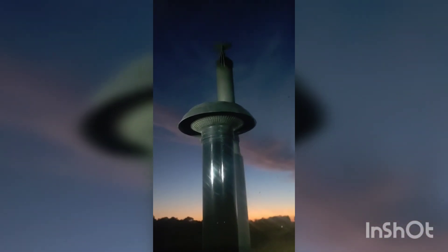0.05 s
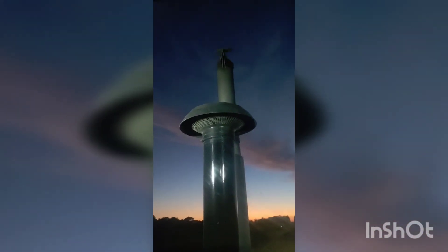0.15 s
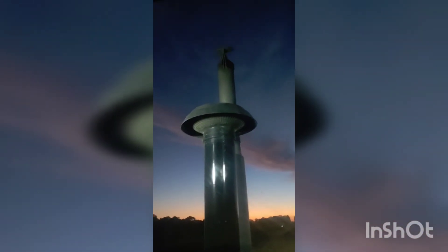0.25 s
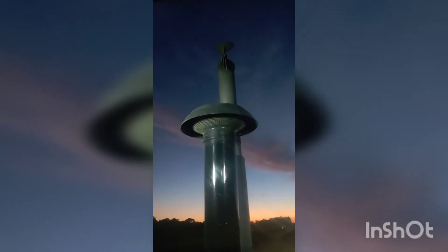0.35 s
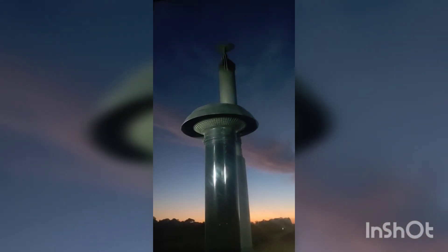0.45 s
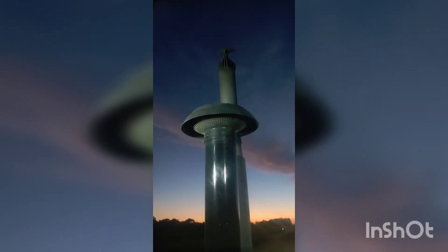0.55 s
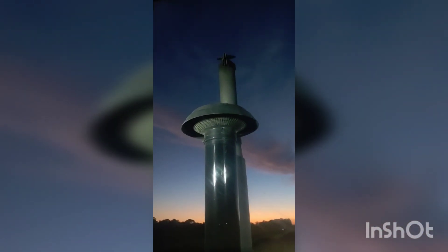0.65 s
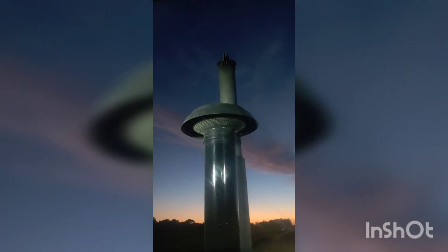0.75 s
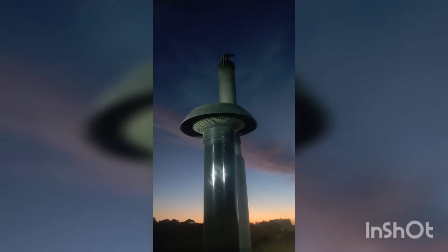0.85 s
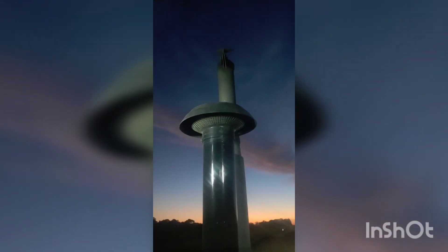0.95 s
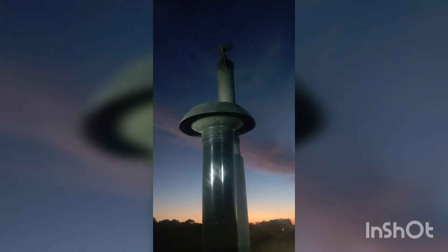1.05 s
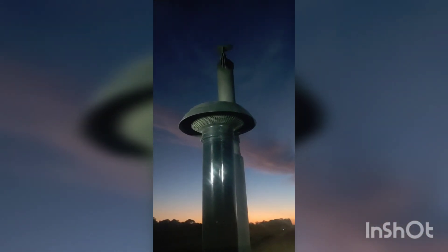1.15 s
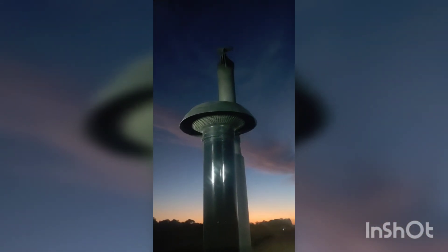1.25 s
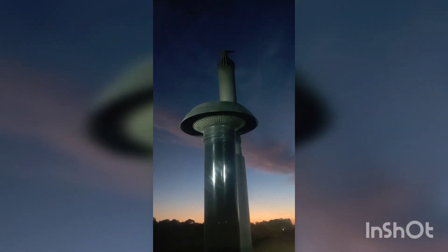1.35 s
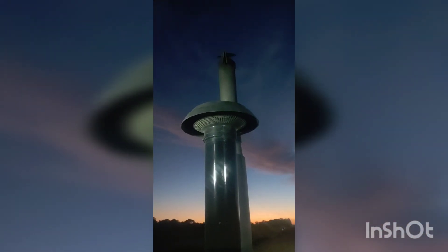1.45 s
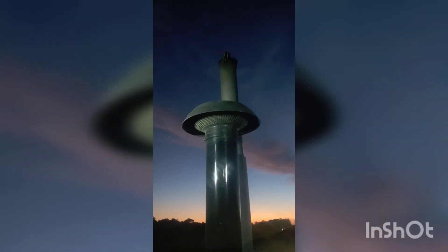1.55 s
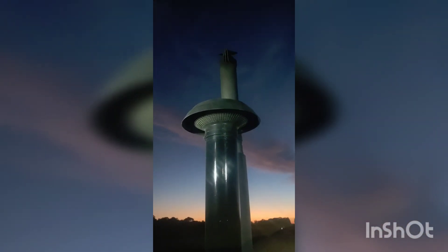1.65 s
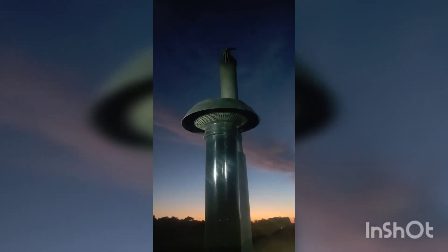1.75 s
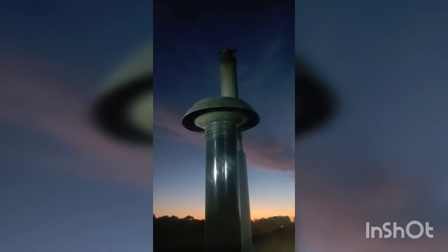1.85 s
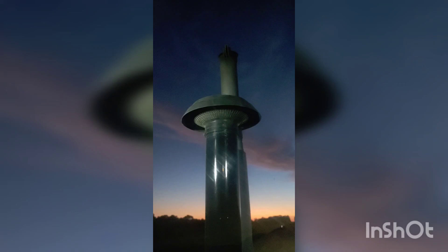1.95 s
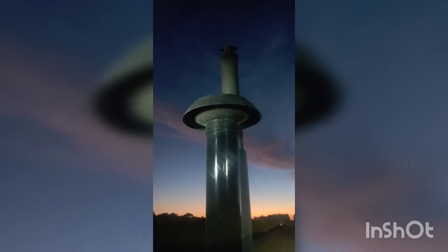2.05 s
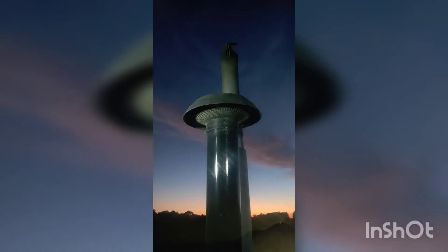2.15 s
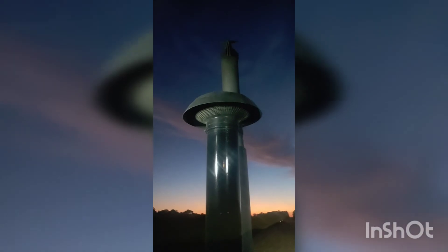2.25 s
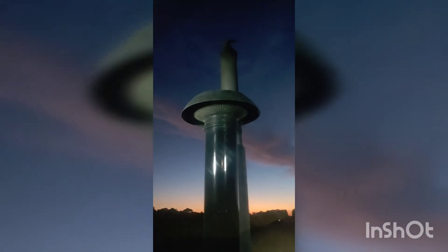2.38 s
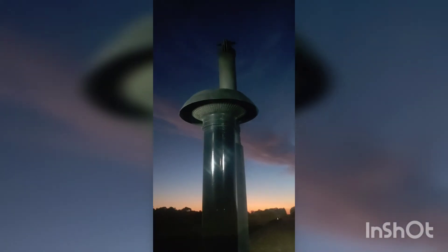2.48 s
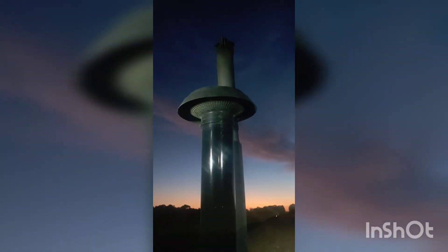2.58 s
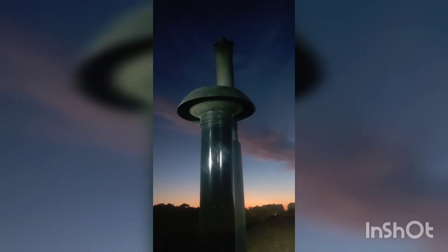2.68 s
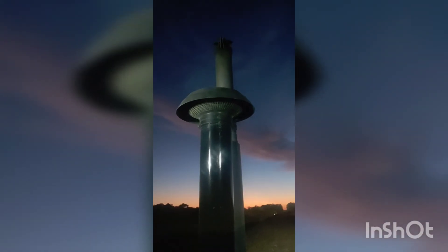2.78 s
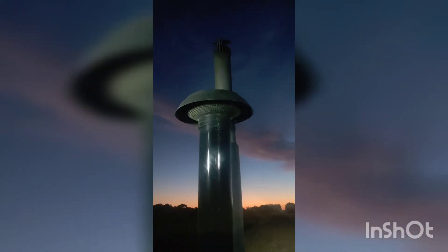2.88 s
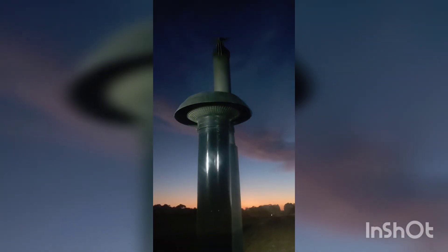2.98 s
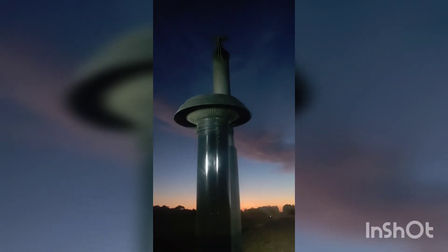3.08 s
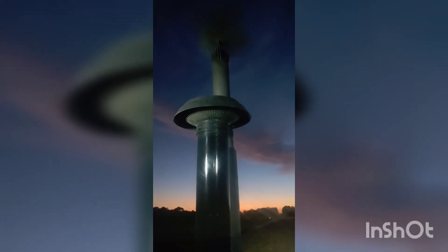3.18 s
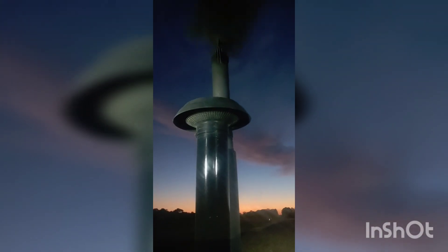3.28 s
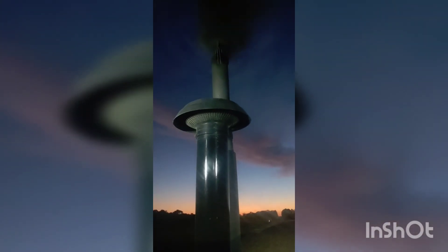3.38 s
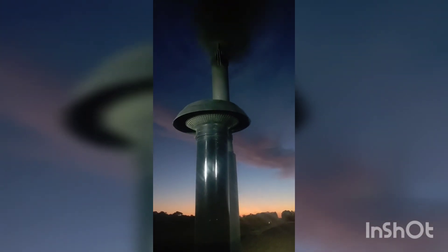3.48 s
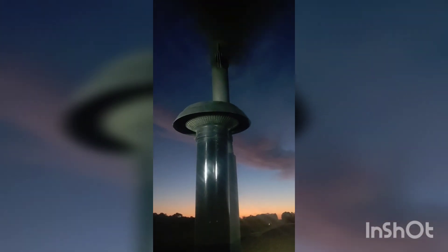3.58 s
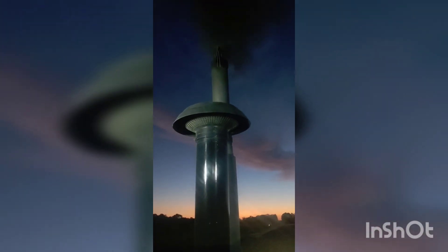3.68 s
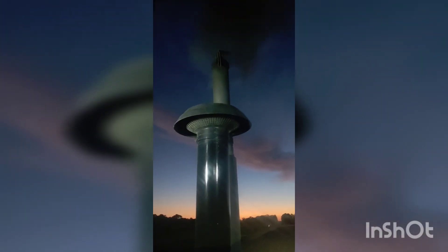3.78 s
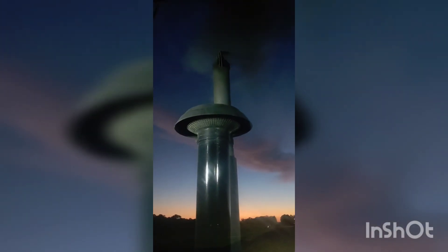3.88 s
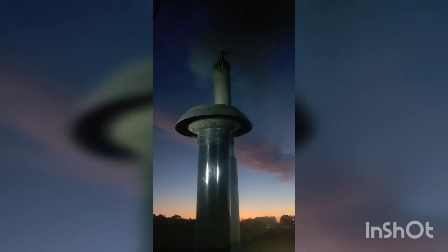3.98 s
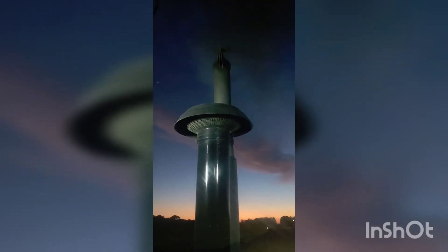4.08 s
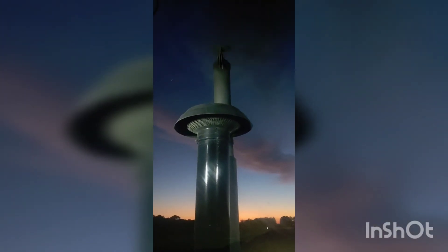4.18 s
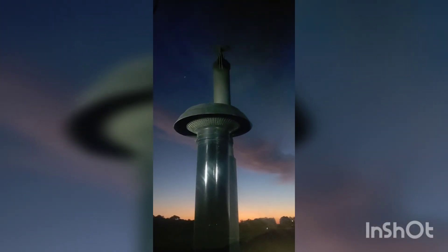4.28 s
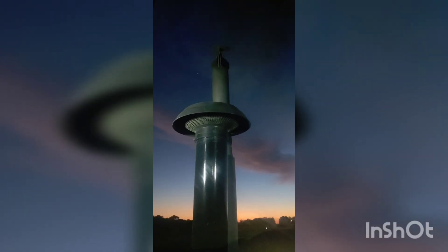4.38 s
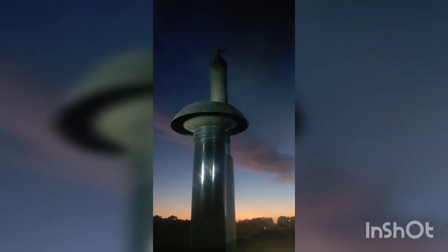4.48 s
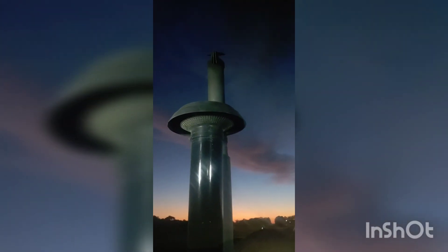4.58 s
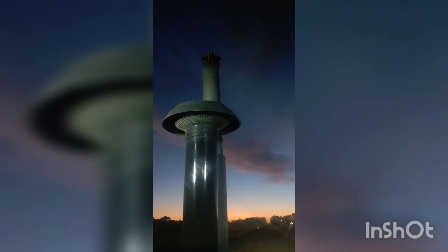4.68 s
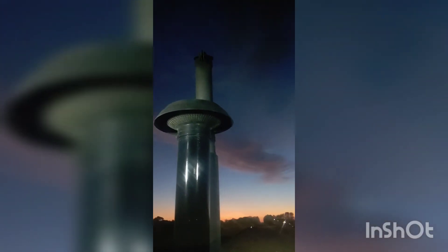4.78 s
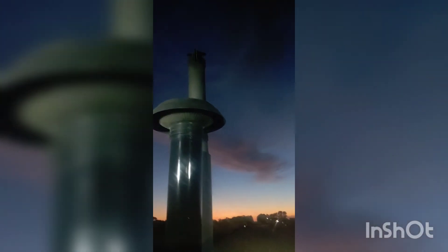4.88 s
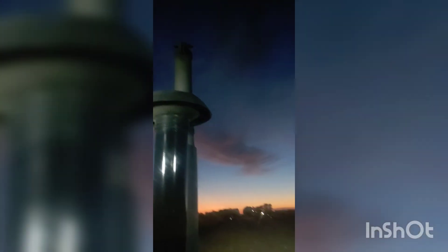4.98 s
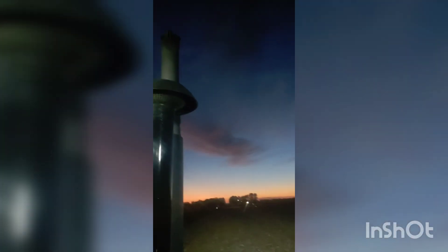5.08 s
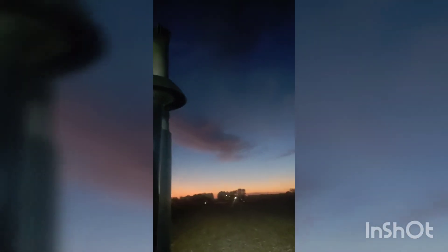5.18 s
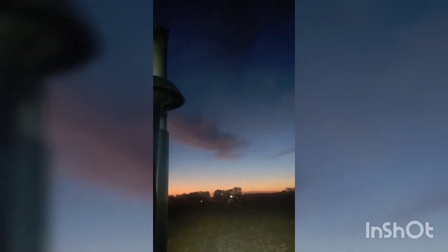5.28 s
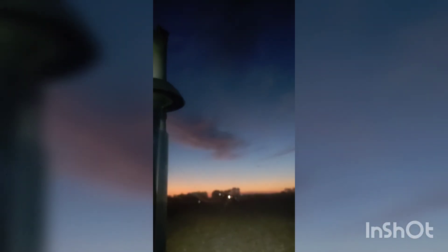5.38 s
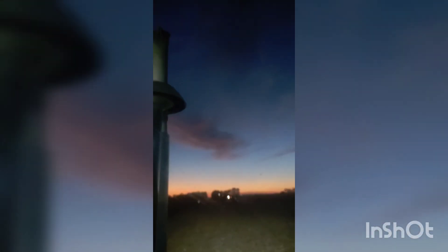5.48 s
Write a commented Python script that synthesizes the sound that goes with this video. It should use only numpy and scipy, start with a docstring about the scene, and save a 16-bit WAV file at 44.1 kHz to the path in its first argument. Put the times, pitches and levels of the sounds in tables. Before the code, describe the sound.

A six-cylinder tractor diesel idles in a closed cab, blips lightly, settles, then revs hard just after three seconds and coasts down.

```python
"""Inside a closed tractor cab a six-cylinder diesel idles, and a first blip lifts it over the opening half second.
Throughout, crank orders and a pump excite the cab's modes; clatter, roar, knock and valves are noise pulsed by firing;
a housing rings on one pitch and a gear mesh glides past it. From 0.3 s an injector ticks in decaying bursts at low
speed. The engine sinks to idle by 2 s; a second, harder blip at 3 s peaks near 3.7 s in knock and valve noise.
It then coasts down, and the ticks return after 5 s."""
import sys
import numpy as np
from scipy import signal
from scipy.fft import rfft, irfft, next_fast_len
from scipy.io import wavfile
from scipy.ndimage import uniform_filter1d

SR = 44100
rng = np.random.default_rng(int(sys.argv[2]) if len(sys.argv) > 2 else 0)


def to_wav(s):
    """Save 16-bit WAV."""
    ch = np.atleast_2d(s).T  # columns
    pcm = np.round(np.clip(ch, -1, 1) * 32767)  # PCM
    wavfile.write(sys.argv[1], SR, pcm.astype(np.int16))


N = 244314

# modes of the cab's air and panels: (f/Hz, nominal width/Hz, level/dB)
CAB_MODES = [(30, 30, -28), (60.5, 27, -20.5), (89, 38, -11.5), (106.4, 12.4, -1), (127.9, 12, 6),
             (146.4, 8.1, 2), (154, 11, -6), (170.4, 16, -2), (187.6, 15.4, -0.5), (233, 12.5, -5.5),
             (246.6, 18, 1.5), (263, 8.6, -1), (283, 11, -13.5), (309, 11, -14.5), (389, 19, -13),
             (513, 33, -15), (597, 26, -11)]
# broad colour of each noise: (f/Hz, relative density/dB per Hz); its ringing panels: (f/Hz, width/Hz, level above it/dB)
CLATTER_COLOUR = [(180, -84), (300, -1.5), (411, -9), (489, -3.5), (587, -8), (706, -8), (754, -12),
                  (1280, -22.5), (1610, -17.5), (2250, -10.5), (3360, -24.5), (4000, -29.5), (5200, -35),
                  (8800, -120)]
CLATTER_RINGS = [(323, 14, 8), (483, 18, 9), (520, 30, 5), (562, 14, 5), (609, 18, 8), (700, 36, 7),
                 (797, 16, 6), (1760, 86, 4), (2212, 26, 9), (2285, 60, 6), (2430, 60, 6), (2505, 45, 6)]
ROAR_COLOUR = [(180, -10), (300, -11), (375, -5.5), (440, -9.5), (484, -5.5), (532, -3.5), (620, -3),
               (700, 0), (800, -4.5), (920, 3), (1020, -0.5), (1300, -2), (1380, -6), (1930, -12),
               (2250, -9.5), (2650, -10), (3800, -29.5), (4940, -51), (8360, -120)]
ROAR_RINGS = [(490, 50, 5), (614, 30, 8), (984, 22, 6), (1056, 36, 7), (1175, 26, 7), (1258, 22, 6),
              (1305, 26, 6), (1513, 22, 10), (1838, 26, 6), (2555, 28, 5), (2722, 42, 8)]
KNOCK_COLOUR = [(2290, -49), (3900, -1), (4460, 2.5), (5170, 2), (5630, 1), (5900, -3), (7670, -46),
                (13000, -120)]
KNOCK_RINGS = [(4200, 80, 3.5), (4490, 75, 6.2), (4990, 64, 8.6), (5230, 68, 8.1), (5580, 87, 4.4)]
VALVE_COLOUR = [(3290, -45), (5600, -5.5), (6120, -0.5), (6420, 0.5), (8150, -3), (8870, -6), (9830, -6),
                (13000, -13), (15500, -26)]
VALVE_RINGS = [(6090, 70, 9), (6700, 50, 6), (7100, 40, 4), (7840, 30, 6), (8470, 40, 6), (9510, 50, 8),
               (9770, 50, 5), (10100, 70, 5), (10480, 50, 6), (11450, 90, 6), (12620, 35, 11)]
# metallic resonances of the injector tick: (f/Hz, width/Hz, level above the flat part/dB)
TICK_RINGS = [(10300, 700, 8), (11440, 500, 15), (12800, 900, 7)]
# coherence of the two ports: (f/Hz, share of power common to both)
COMMON_SHARE = [(60, 0.94), (130, 0.98), (290, 0.8), (640, 0.62), (1400, 0.088), (3100, 0.38),
                (6800, 0.072), (15000, 0.1)]
# balance of the ports: (f/Hz, left minus right level/dB)
LEFT_MINUS_RIGHT = [(60, 9), (110, 2), (200, 0.5), (380, -4.5), (700, 2), (1290, -1.5), (2380, -8.5),
                    (4400, 1.5), (8120, -3.5), (15000, -12)]
# crank speed: (t/s, turns per s)
CRANK_SPEED = [(0.0, 12.49), (0.14, 13.32), (0.3, 15.47), (0.58, 16.12), (0.9, 15.62), (1.52, 15.58),
               (1.85, 13.53), (2.09, 12.93), (2.3, 13.37), (3.07, 13.33), (3.3, 17.5), (3.5, 21),
               (3.73, 26.2), (3.93, 24.1), (4.33, 21.1), (4.6, 19.5), (5.12, 15.15), (5.54, 12.89)]
# how hard each of the six cylinders raps: (relative level/dB, scaled for each layer)
CYLINDER_RAP = [0.85, 0.65, 1.5, 0.4, 0.76, 0.85]
# harshness of combustion: (t/s, level over idle/dB)
LOAD = [(0, -0.5), (.1, 6), (.14, 11), (.18, 8), (.205, 9), (.23, 9), (.27, 8.5), (.29, 14.5), (.32, 9.5),
        (.35, 15.5), (.38, 11), (.41, 11.5), (.48, 8.5), (.56, 8.5), (.68, 4), (1.45, 5.5), (1.74, -3.5),
        (2.11, 2.5), (2.96, 3), (3.05, 6.5), (3.14, 9), (3.18, 13.5), (3.26, 15.5), (3.29, 16.5),
        (3.34, 17.5), (3.38, 19.5), (3.46, 21.5), (3.58, 21.5), (3.62, 21.5), (3.695, 19.5), (3.72, 15.5),
        (3.78, 12), (3.85, 11.5), (3.9, 9), (4.02, 9), (4.12, 7.5), (4.4, 4.5), (5.3, -5), (5.54, -2.5)]
# layer laws: (gain at idle/dB, dB per dB of load, dB per dB of crank speed, dB per product of the two)
BOOM_LAW = (-30, -0.0082, 1.25, 0.0724)
CLATTER_LAW = (-39.5, 0.0224, 1.08, 0.0388)
ROAR_LAW = (-46.5, 0.869, -0.17, 0.0832)
# crank orders that shake the cab: (multiple of crank speed, relative level at idle/dB)
CRANK_ORDERS = [(4, -16), (4.5, -14), (5, -1), (5.5, -9), (6, -1), (6.5, -11), (7, 0), (7.5, -11), (8, 5),
                (8.5, -14), (9, 2.5), (9.5, -14), (10, -5), (11, -6), (11.5, -9), (12, -8), (13, -8),
                (14, -7), (15, -3), (16, -3), (17, 3), (18, -7), (18.5, -5), (19, -7), (20, -10), (21, -8),
                (21.5, -7), (23, -8), (24.5, -11), (26, -2), (27, -8), (28, -2)]
# orders of the geared pump: (multiple of crank speed, relative level/dB)
PUMP_ORDERS = [(7.85, -5), (15.7, 5.5)]
# uneven boom level, with sudden rises and drops: (t/s, level/dB)
BOOM_UNEVENNESS = [(0, 1.5), (.17, -0.5), (.22, 0.5), (.35, -3.5), (.55, 1.5), (.65, -1), (1.2, 0),
                   (1.7, 1), (1.9, 2), (1.95, 0.5), (3.07, -1), (3.11, 2), (3.22, -2.5), (3.29, 2),
                   (3.4, -4), (3.6, -2), (3.9, -1), (4.15, 1.5), (4.19, -3.5), (4.55, 1.5), (4.85, 1),
                   (5.0, -3), (5.12, 0.5), (5.54, -2)]
# injector ticks: (t/s, nominal peak level/dB)
TICKS = [(0.3087, -53), (0.4369, -54), (0.5621, -53), (0.6863, -56), (0.8116, -58), (0.9393, -52),
         (1.0675, -51), (1.1962, -54), (1.3249, -56), (1.716, -56), (1.8654, -53), (2.0103, -57),
         (2.1655, -56), (2.3141, -52), (2.4684, -53), (2.6184, -56), (2.7661, -56), (2.9174, -52),
         (3.0639, -57), (5.0993, -60), (5.2325, -58), (5.3757, -58), (5.5304, -54)]
# level of the knock, climbing unevenly to 3.62 s and then falling away: (t/s, level/dB)
KNOCK_LEVEL = [(0, -61), (.2, -57.5), (.55, -58), (.7, -60.5), (1.5, -61), (1.7, -64), (3.0, -61.5),
               (3.08, -55), (3.19, -54.5), (3.21, -47.5), (3.31, -49.5), (3.37, -41.5), (3.47, -39),
               (3.53, -35), (3.58, -36), (3.62, -32), (3.7, -37.5), (3.73, -45), (3.8, -50.5), (4.0, -59),
               (5.54, -69)]
# treble of the valve gear: (t/s, level/dB)
VALVE_LEVEL = [(0, -60), (.4, -56.5), (.7, -60), (1.5, -59), (1.8, -62), (3.0, -61), (3.11, -60),
               (3.135, -55), (3.19, -55), (3.23, -50.5), (3.38, -45), (3.47, -42), (3.5, -40), (3.66, -35),
               (3.7, -37.5), (3.74, -43), (3.8, -46.5), (3.98, -50), (4.02, -54), (4.2, -56.5), (4.6, -61),
               (5.54, -62.5)]

IDLE_TURNS_S = 13.3
FIRST_TURN = 1.735  # crank position at the start, in turns of the two-turn cycle
FIRINGS_PER_TURN = 3
DRAG_TURNS_S2, TORQUE_LAG_S = 5.8, 0.13  # slowing without fuel; averaging time of the torque
COASTING = 0.72  # least torque, as a share of idle torque
THUD_DB = -51.5  # rms at idle, about which it wavers
FIRING_PER_TORQUE, UNEVEN_PER_SPEED = .3, -1.5  # dB per dB: firing orders follow torque, the others fade with speed
RUMBLE_PER_SPEED = .8  # dB per dB
TURN_STEPS, SLACK_TURNS = 2048, .0012  # steps in the pattern of one turn; scale of play in the gear train
VALVE_LAG_TURNS = 0.102  # the valves close after each firing
WHINE_HZ, WHINE_WIDTH_HZ = 2213, 24
WHINE_DB, WHINE_RISE_DB = -50, 6  # rms at middle speed; limit of the change towards low and high speed
MESH_MULTIPLE = 141.7  # tooth contacts per crank turn
MESH_HZ, MESH_WIDTH_HZ = 2220, 105  # the housing ring that lets them out
MESH_DB = -41  # peak on the ring, about which it wavers
TICK_SHARE = .7  # rms of the burst over its peak
LEFT_LAG_S = 18 / 44100  # nominal delay of left behind right, reduced most in the bass
TOP_HZ = 15750


def undb(db):
    """Amplitude is the twentieth-power-of-ten law of level."""
    return 10 ** (np.asarray(db) / 20)


def unit(x):
    """Division by the root mean square gives unit power."""
    return x / np.sqrt(np.mean(x ** 2))


def along(table, hz):
    """A spectrum is interpolated linearly on a logarithmic frequency axis."""
    f, value = np.transpose(table)
    return np.interp(np.log(hz + 1), np.log(f), value)


def over_time(table):
    """A quantity varies linearly between its tabulated times."""
    t, value = np.transpose(table)
    return np.interp(np.arange(N) / SR, t, value)


def filtered(x, response):
    """Convolution is multiplication by a complex response of frequency."""
    size = next_fast_len(N + SR // 4)
    f = np.arange(size // 2 + 1) * SR / size
    return irfft(rfft(x, size) * response(f), size)[..., :N]


def resonance(f, hz, width):
    """A damped oscillator has unit response at hz and falls off on both sides."""
    return 1j * f * width / (hz ** 2 - f ** 2 + 1j * f * width)


def ringing(rings):
    """Resonances added to a flat response make peaks on it."""
    return lambda f: 1 + sum((undb(db) - 1) * resonance(f, hz, w) for hz, w, db in rings)


def walk(rate):
    """Random levels held 1 / rate s and averaged twice drift smoothly, with a standard deviation near 0.7."""
    k = int(SR / rate)
    held = np.repeat(rng.standard_normal(N // k + 1), k)
    return 0.981 * uniform_filter1d(uniform_filter1d(held, k), k)[:N]


def ports(direct, scattered):
    """Two ports share a common wave, late on the left, and receive reflections that differ at each."""
    side = np.array([[1], [-1]])

    def share(f):
        return np.clip(along(COMMON_SHARE, f), 0, 1)

    def late(f):
        # the bass fills the cab as standing waves and reaches both ports almost together
        lag = LEFT_LAG_S * (0.41 + 0.57 / (1 + (950 / (f + 1)) ** 6))
        return np.exp(-1j * np.pi * f * side * lag)

    common = filtered(direct, lambda f: np.sqrt(share(f)) * late(f))
    separate = filtered(scattered, lambda f: np.sqrt(1 - share(f)))
    return filtered(common + separate, lambda f: undb(side * along(LEFT_MINUS_RIGHT, f) / 2))


def torque(speed):
    """Firing torque in dB over idle balances the drag and the acceleration of the crank."""
    gain = uniform_filter1d(np.gradient(speed) * SR, int(TORQUE_LAG_S * SR))
    return 20 * np.log10(np.maximum(1 + gain / DRAG_TURNS_S2, COASTING))


def law_gain(law, load_db, speed_db):
    """A layer's level is bilinear in load and speed."""
    idle_db, per_load, per_speed, per_both = law
    return undb(idle_db + per_load * load_db + per_speed * speed_db + per_both * load_db * speed_db)


def thud(turns, torque_db):
    """Periodic firing gives a sine at the firing rate that grows with torque."""
    db = THUD_DB + .8 * torque_db + 2.5 * walk(6)
    return np.sqrt(2) * undb(db) * np.sin(2 * np.pi * FIRINGS_PER_TURN * turns)


def boom(turns, speed_db, torque_db):
    """Forced vibration: wavering crank and pump orders and a loose rumble excite the cab's modes."""
    # phase wander in turns: the lines break up away from idle
    unsteady = .04 + .015 * np.abs(torque_db) + .024 * np.abs(speed_db)

    def line(multiple, db, waver_db):
        phase = multiple * turns + rng.random() + unsteady * walk(7)
        return undb(db + waver_db * walk(10)) * np.sin(2 * np.pi * phase)

    def cab(f):
        power = 0
        for hz, width, db in CAB_MODES:
            power = power + (undb(db) * np.abs(resonance(f, hz, width)) ** 1.31) ** 2
        return np.sqrt(power)

    lines = np.zeros(N)
    for multiple, db in CRANK_ORDERS:
        uneven = multiple % FIRINGS_PER_TURN
        change_db = UNEVEN_PER_SPEED * speed_db if uneven else FIRING_PER_TORQUE * torque_db
        lines += line(multiple, db + change_db, 2.8 + .3 * np.abs(speed_db))
    for multiple, db in PUMP_ORDERS:
        lines += line(multiple, db, 1.5 + 0.74 * np.maximum(speed_db + 1.0, 0))
    rumble = undb(15 + RUMBLE_PER_SPEED * speed_db) * rng.standard_normal((3, N))
    return unit(ports(filtered(lines + rumble[0], cab), filtered(rumble[1:] * undb(7.0), cab)))


def every_turn(turns):
    """A pattern that recurs each turn, as gears and valves rap, contains every multiple of the crank speed."""
    pattern = irfft(np.exp(2j * np.pi * rng.random((3, TURN_STEPS // 2 + 1))))
    place = (turns + SLACK_TURNS * walk(4)) % 1 * TURN_STEPS
    return unit(pattern[:, place.astype(int) % TURN_STEPS])


def beaten(turns, colour, rings, rap_db, uneven, flicker_db, scatter_db, repeats):
    """Amplitude modulation: noise jumps at each firing, sinks until the next and rings the panels."""
    firings = FIRINGS_PER_TURN * turns
    count = firings.astype(int)
    throb_db = uneven * np.take(CYLINDER_RAP, count % 6) - rap_db * np.sqrt(firings % 1)
    throb_db = throb_db + flicker_db * walk(45)
    throb_db = throb_db + scatter_db * rng.standard_normal(N // 100)[count]  # no two firings are alike
    # a share of the power repeats each turn, the rest is fresh noise
    raps = np.sqrt(repeats) * every_turn(turns) + np.sqrt(1 - repeats) * rng.standard_normal((3, N))
    noise = uniform_filter1d(undb(throb_db), size=30) * raps
    noise = filtered(noise, lambda f: undb(along(colour, f)) * ringing(rings)(f))
    return unit(ports(noise[0], noise[1:]))


def clatter(turns):
    """Mechanical impacts recur mostly alike each turn and ring the panels."""
    return beaten(turns, CLATTER_COLOUR, CLATTER_RINGS,
                  rap_db=2.0, uneven=0.95, flicker_db=0.5, scatter_db=0.7, repeats=0.75)


def roar(turns):
    """Combustion pressure drives broad noise that varies from firing to firing."""
    return beaten(turns, ROAR_COLOUR, ROAR_RINGS,
                  rap_db=3, uneven=0.57, flicker_db=0.5, scatter_db=1.8, repeats=0.35)


def knock(turns):
    """Each firing pulses a narrow band of noise about 5 kHz that sinks before the next."""
    return undb(over_time(KNOCK_LEVEL)) * beaten(
        turns, KNOCK_COLOUR, KNOCK_RINGS, rap_db=6, uneven=.5, flicker_db=1, scatter_db=1, repeats=.4)


def valve_gear(turns):
    """Valve closures, a fixed crank angle after each firing, pulse the treble."""
    closing = turns + 2 - VALVE_LAG_TURNS  # one whole cycle added keeps the position positive
    return undb(over_time(VALVE_LEVEL)) * beaten(
        closing, VALVE_COLOUR, VALVE_RINGS, rap_db=5, uneven=.8, flicker_db=1.2, scatter_db=.4, repeats=.3)


def housing_ring(speed_db):
    """A sharp resonance excited by noise rings thinly on one pitch at any speed."""
    ring = filtered(rng.standard_normal(N), lambda f: resonance(f, WHINE_HZ, WHINE_WIDTH_HZ) ** 2)
    return undb(WHINE_DB + WHINE_RISE_DB * np.tanh((speed_db - 2.5) / 3)) * unit(ring)


def gear_mesh(turns):
    """Tooth contact makes a tone proportional to speed, heard only while it crosses the housing's resonance."""
    phase = 2 * np.pi * (MESH_MULTIPLE * turns + .04 * walk(6))
    tone = undb(MESH_DB + 1.1 * walk(11.3)) * np.sin(phase)
    return filtered(tone, lambda f: resonance(f, MESH_HZ, MESH_WIDTH_HZ) ** 2)


def injector():
    """Impact: each tick is an exponentially decaying metallic burst with a rebound 5 ms later."""
    envelope, t = np.zeros(N + 2000), np.arange(2000) / SR
    blow = np.exp(-t / 0.0033) + .5 * (t > .005) * np.exp(-(t - .005) / 0.0068)
    for start, db in TICKS:
        first = int(start * SR)
        envelope[first:first + len(t)] += TICK_SHARE * undb(db) * blow

    def ring(f):
        return ringing(TICK_RINGS)(f) * resonance(f, 10700, 5000) ** 2

    noise = rng.standard_normal((3, N))
    bursts = filtered(envelope[:N] * noise, ring) / np.std(filtered(noise, ring))
    return ports(bursts[0], bursts[1:])


def scene():
    """Superposition: one crank motion drives the engine's layers and the timed ticks are added."""
    speed, load_db = over_time(CRANK_SPEED), over_time(LOAD)
    speed_db, torque_db = 20 * np.log10(speed / IDLE_TURNS_S), torque(speed)
    turns = FIRST_TURN + np.cumsum(speed) / SR
    boom_gain = law_gain(BOOM_LAW, load_db, speed_db) * undb(over_time(BOOM_UNEVENNESS))
    mix = thud(turns, torque_db) + boom_gain * boom(turns, speed_db, torque_db)
    mix = mix + law_gain(CLATTER_LAW, load_db, speed_db) * clatter(turns)
    mix = mix + law_gain(ROAR_LAW, load_db, speed_db) * roar(turns)
    mix = mix + knock(turns) + valve_gear(turns)
    whine = housing_ring(speed_db) + gear_mesh(turns)
    mix = mix + whine * undb([[-18.0], [0]])  # from the right
    return mix + injector()


def record(dry):
    """A steep elliptic low-pass, as in a phone, removes the top of the spectrum."""
    return signal.sosfilt(signal.ellip(14, .2, 90, TOP_HZ, fs=SR, output="sos"), dry)


dry = scene()
out = record(dry)
to_wav(out)
```